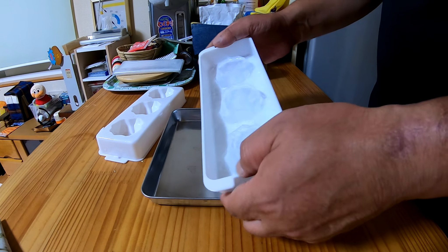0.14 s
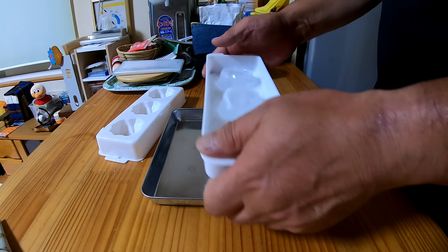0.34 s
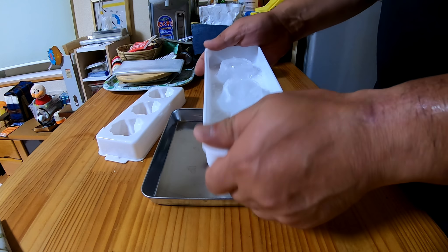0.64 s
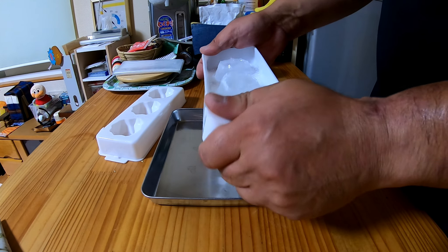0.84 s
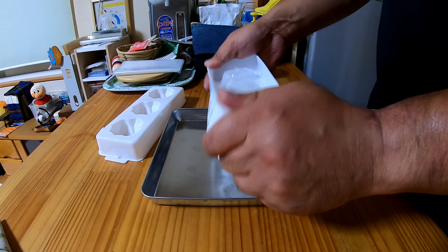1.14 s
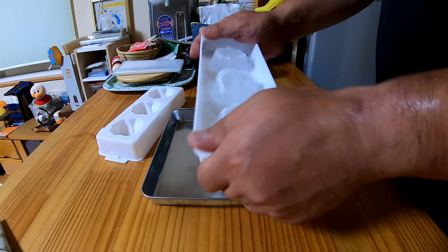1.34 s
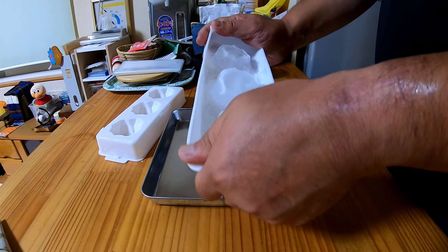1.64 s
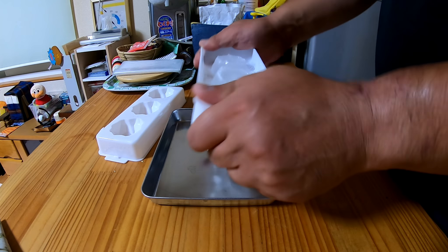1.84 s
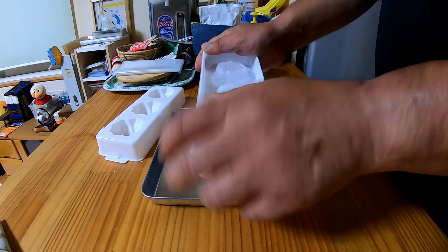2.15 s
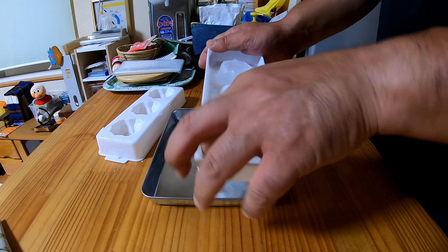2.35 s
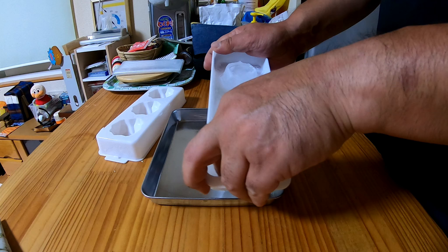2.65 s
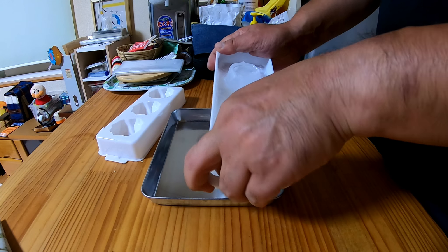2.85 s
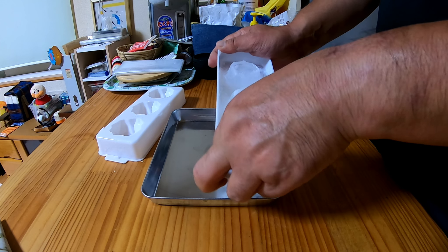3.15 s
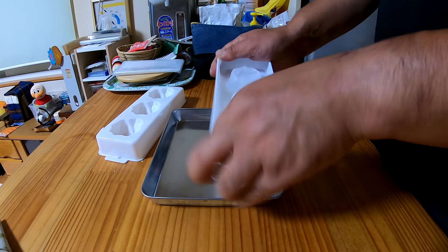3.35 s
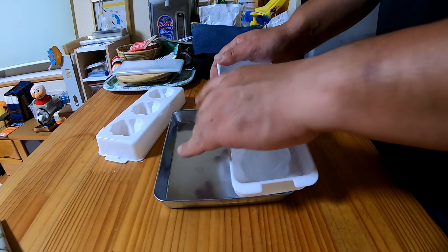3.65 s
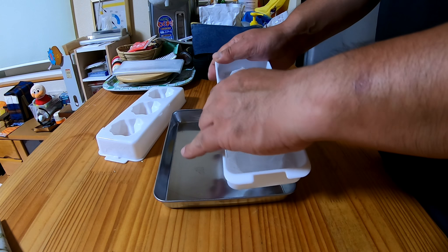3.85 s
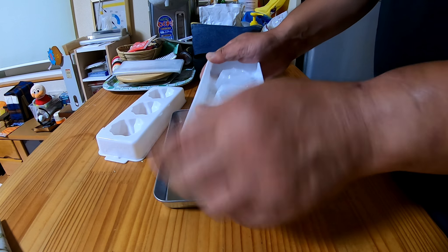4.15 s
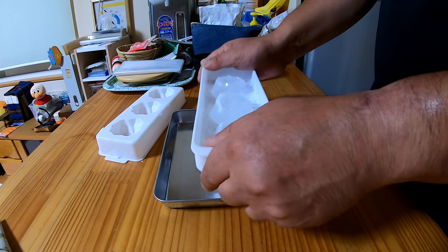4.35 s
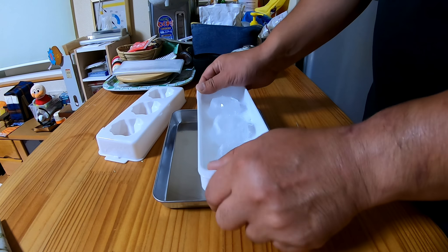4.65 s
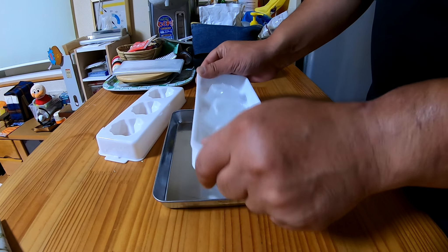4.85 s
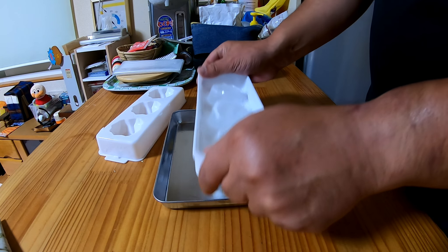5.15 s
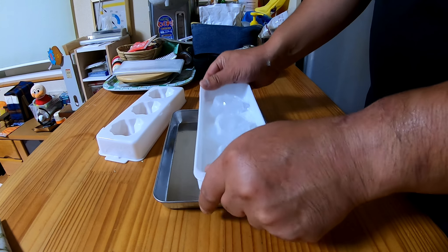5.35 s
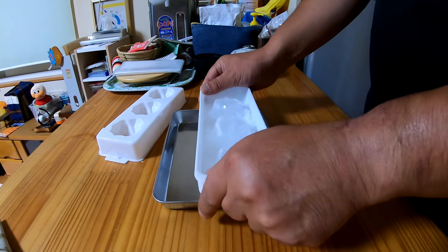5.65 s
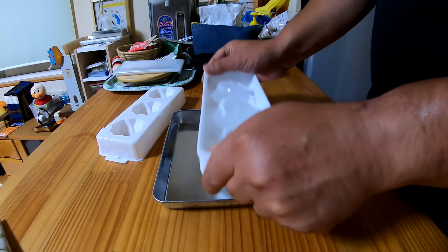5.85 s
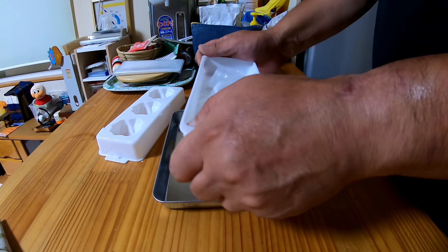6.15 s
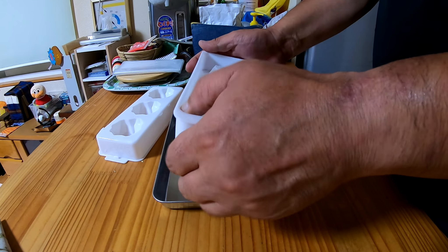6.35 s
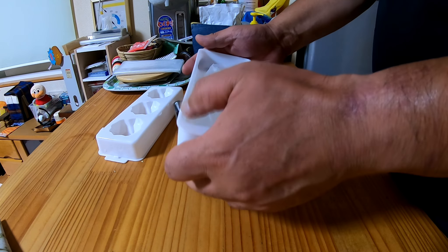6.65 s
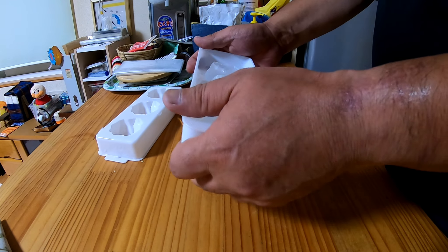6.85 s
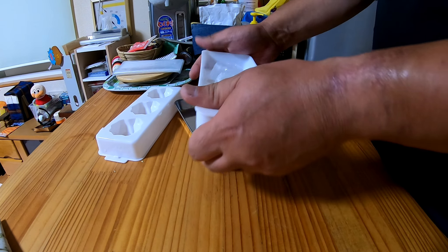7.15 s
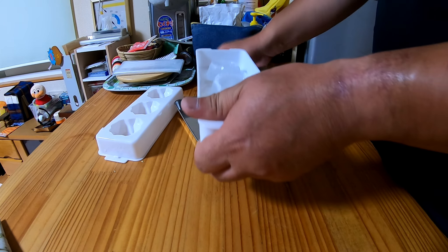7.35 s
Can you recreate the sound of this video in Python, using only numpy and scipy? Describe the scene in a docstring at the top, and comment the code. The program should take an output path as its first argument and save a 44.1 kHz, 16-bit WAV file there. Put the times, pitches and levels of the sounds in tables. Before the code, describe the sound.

A plastic ice cube tray is twisted, creaking and cracking sharply, then banged several times against a steel pan on a wooden table.

```python
"""A quiet kitchen hums, then fingers rustle on a plastic ice tray and it is twisted over a steel pan.
Stick-slip clicks make the creak, splinter bursts and cell rings the cracks, friction noise the squeaks.
Later the tray is knocked down on the pan: noise clatters, modes of the wooden table boom,
and low swings rock the camera standing on it. Sparse taps form the room tail; gain control ducks loud peaks.
"""
import sys
import numpy as np
from scipy import signal
from scipy.io import wavfile
from scipy.ndimage import uniform_filter1d

SR = 44100
rng = np.random.default_rng(int(sys.argv[2]) if len(sys.argv) > 2 else 0)


def field_ratio(decibels):
    """Amplitude ratio for a level in dB (20 dB per decade); scalars and array-likes work."""
    return 10 ** (np.asarray(decibels, dtype=float) / 20)


def master_out(mix):
    """Clip the mix to full scale and print it as 16-bit PCM to the path in sys.argv[1]."""
    frames = np.transpose(np.atleast_2d(mix))
    ceiling = np.clip(frames, -1, 1)
    pcm = np.round(ceiling * 32767).astype(np.int16)
    wavfile.write(sys.argv[1], SR, pcm)


N = 330750

# room air spectrum, relative: pitch_hz, level_db
AIR_COLOUR = [(15, -46), (25, -1.5), (91, -17), (219, -1), (554, -18.5), (649, -13), (916, -24.5),
              (1100, -15), (3630, -26.5), (7610, -38), (14000, -60.5)]
# wavering appliance tones: pitch_hz, resonator_width_hz, level_db
HUM_TONES = [(48, 6.6, -82.5), (153.3, 5.1, -71.5), (213, 23, -76), (1070, 16, -85)]
# left-right likeness of the air: pitch_hz, likeness [0-1]
AIR_LIKENESS = [(30, 0.4), (150, 0.71), (1000, 0.34), (5000, 1), (12000, .3)]

# sustained strains, the long twist and the tray dragged onto the pan: time_s, creak_db, hollow_rel_db
STRAINS = [
    [(0.633, -64, -23), (0.756, -51.5, -1.5), (0.768, -36.5, -20), (0.814, -39.5, -16), (0.926, -35, -14),
     (1.189, -51.5, -9.5), (1.3, -60, -9)],
    [(3.35, -60, -10), (3.384, -35, -16.5), (3.44, -42.5, -8), (3.464, -31, -15.5), (3.532, -38, -20),
     (3.612, -36, -11.5), (3.676, -55, -18)],
]
# short creaks that catch quickly and let go: peak_s, peak_db, fall_20db_s, hollow_rel_db
CREAKS = [(.405, -50.5, 0.14, -8.5), (1.205, -42, .12, -7), (1.333, -34, 0.06, -5),
          (1.39, -46.5, 0.13, -15.5), (1.42, -42.5, .035, -2.5), (1.616, -48, 0.06, -9.5),
          (1.754, -44, 0.06, -10.5), (1.804, -37, 0.0559, -12.5), (1.857, -46, 0.18, -9.5),
          (2.037, -51.5, .05, -11.5), (2.062, -43, 0.04, 0), (2.092, -43, 0.057, -5.5),
          (2.432, -54, 0.36, -8), (2.644, -35, 0.054, -27), (2.844, -59.5, 0.3, -30.5),
          (2.95, -52, 0.07, -6), (5.988, -47, 0.07, -11), (6.07, -45, 0.0456, -17), (6.45, -57, 0.5, -8)]
# fingers sliding on the plastic: peak_s, peak_db, rise_or_fall_20db_s
RUSTLES = [(.3, -62, .5), (1.525, -53, 0.17), (2.6, -53, .35), (4.33, -66, 0.13), (6.14, -62, 0.2),
           (6.37, -66, .08), (7.25, -64, 0.15)]
# the tray scrapes the pan until it lands: end_s, end_db, rise_20db_s
SCRAPES = [(4.968, -37, 0.0375), (5.28, -41, 0.017), (5.591, -39, 0.0134), (6.64, -37.5, 0.0438)]
# colour of the creak: pitch_hz, level_db
CREAK_COLOUR = [(260, -32), (634, -13.5), (701, -21), (1100, -12), (1340, -9), (3080, -7), (5080, -11),
                (7440, -7.5), (16000, -45)]
# resonances of the plastic tray: pitch_hz, width_hz, mean_level_db
TRAY_MODES = [(1080, 130, -1), (2460, 200, -3), (3070, 130, -3), (7200, 170, -16)]

# room decay: pitch_hz, t60_s
ROOM_DECAY = [(100, 0.31), (420, 0.24), (1100, 0.32), (2900, 0.29), (7700, 0.37)]

# single cracks of ice and plastic: start_s, level_db, cell_ring_hz
CRACKS = [(0.293, -46, 2900), (0.4035, -34, 2720), (0.462, -42, 1300), (0.765, -19, 3840),
          (0.7672, -20, 6600), (0.943, -20, 3020), (0.985, -27, 1700), (1.4024, -26, 5600),
          (1.417, -26, 2900), (1.6158, -37, 1620), (1.7508, -32, 3570), (1.7972, -27, 3630),
          (1.8532, -30, 2770), (2.058, -22, 1550), (2.0767, -24.5, 2090), (2.4303, -35.5, 3500),
          (2.491, -29, 2720), (2.5177, -28.5, 2740), (2.5301, -22, 2670), (2.5664, -8.5, 3080),
          (2.6285, -8.5, 3200), (2.6335, -11.5, 3225), (2.7391, -30.5, 2030), (2.8748, -26, 2280),
          (2.9394, -15.5, 2270), (3.3826, -24, 3150), (3.447, -17.5, 1920), (3.4602, -14.5, 2200),
          (3.536, -25, 2700), (3.5728, -24, 2010), (3.6604, -22, 2840), (3.685, -9, 1550),
          (3.897, -47, 1700), (5.047, -29, 6200), (5.5586, -28, 2440), (6.067, -36.5, 3140),
          (6.4065, -49, 3220), (6.636, -16, 1690), (7.2853, -40, 2090)]
# colour of a splinter: pitch_hz, level_db
SPLINTER_COLOUR = [(290, -70), (500, -48), (1400, -25.5), (3200, 4), (4870, -7), (10100, -12), (16000, -43)]

# damp skin drags on a cell wall: peak_s, peak_db, rise_or_fall_20db_s, wall_hz
SQUEAKS = [(.42, -54, .06, 2800), (4.048, -58, .06, 2050), (4.35, -59, .05, 2200), (7.27, -56, .06, 2100)]
# fuzzy resonances of a cell wall: multiple_of_wall_hz, level_db
WALL_MODES = [(.55, -5), (1, 0), (2.8, -11)]

# knocks on the pan: start_s, clatter_db, burst_t60_s, boom_db, rocking_db, rocking_hz
KNOCKS = [(3.466, -2, 0.04, -11, -8.5, 67), (3.595, -16, 0.049, -35, -15.5, 68),
          (3.684, -6, 0.043, -19, -14, 66.4), (4.64, 3, 0.049, -4, 0, 67.2), (4.972, 4, 0.041, -8, -5, 75),
          (5.29, 6, 0.033, -4.5, 0.5, 67), (5.598, 4.5, 0.021, -7, -1.5, 63.9),
          (6.556, -39.5, 0.2, -37.5, -60.5, 66), (6.583, -28, 0.2, -24, -55, 66),
          (6.622, -18.5, 0.18, -26, -42, 66), (6.65, 4, 0.11, -8, -14, 69)]
# colour of the clatter: pitch_hz, level_db
CLATTER_COLOUR = [(180, -23.5), (300, -1.5), (885, -10.5), (2790, -8), (4520, -20), (7320, -19),
                  (13800, -45), (16000, -70)]
# table modes before each blow's scatter: pitch_hz, level_db, t60_s
TABLE_MODES = [(90, -8, 0.15), (138.7, 0, 0.22), (176.6, 9.5, 0.079), (216, 1.5, 0.15), (277, -8.5, 0.22),
               (362.3, -4, 0.095), (559, -14, .08), (810, -18, 0.14)]
# faint long ring of the pan: pitch_hz, level_rel_boom_db, t60_s
PAN_RING = (157, -34.5, 1.1)

# colour of what differs between the ports: pitch_hz, level_db
PORT_COLOUR = [(500, -22), (3000, -11), (6000, -7.5), (9000, 1), (14000, -3.5)]


def evened(x):
    """Scales to rms 1."""
    return x / np.sqrt(np.mean(x ** 2) + 1e-20)


def wander(width):
    """Slow noise of rms 1, smoothed twice over width samples."""
    noise = rng.standard_normal(N)
    return evened(uniform_filter1d(uniform_filter1d(noise, width), width))


def patchy(shape, bins, frames):
    """Noise of rms 1, smoothed over frequency bins and time frames."""
    noise = rng.standard_normal(shape)
    return evened(uniform_filter1d(uniform_filter1d(noise, bins, 0), frames, 1))


def read(points, hz):
    """Reads a table by pitch on a log-frequency axis."""
    f, value = np.transpose(points)
    return np.interp(np.log(hz + 1), np.log(f + 1), value)


def add(mix, start_s, sound):
    """Adds a two-channel sound at start_s."""
    part = mix[:, round(start_s * SR):][:, :sound.shape[1]]
    part += sound[:, :part.shape[1]]


def colour(x, points):
    """Minimum-phase filter with the gain of a pitch_hz, level_db table."""
    hz = abs(np.fft.fftfreq(4096, 1 / SR))
    log_gain = np.log(field_ratio(np.maximum(read(points, hz), -90)))
    taps = np.fft.ifft(np.exp(np.conj(signal.hilbert(log_gain)))).real[:2048]
    return signal.oaconvolve(x, taps)[:len(x)]


def resonate(x, hz, width_hz):
    """Two-pole resonance with gain near 1 at its centre."""
    r = np.exp(-np.pi * width_hz / SR)
    return signal.lfilter([1 - r, 0, r - 1], [1, -2 * r * np.cos(2 * np.pi * hz / SR), r * r], x)


def ring(t, hz, t60_s, phase=0.):
    """One dying mode."""
    return field_ratio(-60 * t / t60_s) * np.sin(2 * np.pi * hz * t + phase)


def sides(x, pan_db):
    """Places a mono sound between the channels, positive to the left."""
    return x * field_ratio([[pan_db / 2], [-pan_db / 2]])


def hum():
    """Room air is partly shared noise with slow patches; appliance tones are narrow-band noise."""
    hz = np.fft.rfftfreq(2048, 1 / SR)
    shape = (len(hz), N // 512 + 5)
    a, b, c, d = rng.standard_normal((4, *shape))
    same = np.clip(read(AIR_LIKENESS, hz), -1, 1)[:, None]
    left = a + 1j * b
    right = same * left + np.sqrt(1 - same ** 2) * (c + 1j * d)
    level_db = read(AIR_COLOUR, hz)[:, None] + 0.5 * patchy(shape, 20, 10)
    z = np.array([left, right]) * field_ratio(level_db)
    air = field_ratio(-64.8) * evened(signal.istft(z, nperseg=2048, noverlap=1536)[1][:, :N])
    noise = rng.standard_normal(N)
    tones = sum(field_ratio(db) * evened(resonate(resonate(noise, f, width_hz), f, width_hz))
                for f, width_hz, db in HUM_TONES)
    return air + tones


def strain():
    """Level and hollowness of the creak: strains add as powers, and the strongest sets the colour."""
    t = np.arange(0, N + 32, 32) / SR
    catch_s, scrape_stop_s = 0.027, 0.01  # s per 20 dB
    rustle_hollow_db, scrape_hollow_db = -6, -3.5
    shapes = []
    for s, db, hollow_db in map(np.transpose, STRAINS):
        shapes.append((np.interp(t, s, db, -120, -120), np.interp(t, s, hollow_db)))
    peaks = [(s, db, catch_s, fall_s, hollow_db) for s, db, fall_s, hollow_db in CREAKS]
    peaks += [(s, db, slope_s, slope_s, rustle_hollow_db) for s, db, slope_s in RUSTLES]
    peaks += [(s, db, rise_s, scrape_stop_s, scrape_hollow_db) for s, db, rise_s in SCRAPES]
    for s, db, rise_s, fall_s, hollow_db in peaks:
        shapes.append((db - 20 * np.maximum((s - t) / rise_s, (t - s) / fall_s), hollow_db))
    power, hollow = 1e-12, 0
    for db, hollow_db in shapes:
        power = power + field_ratio(2 * db)
        hollow = hollow + field_ratio(2 * db) * hollow_db
    return np.repeat(10 * np.log10(power), 32)[:N], np.repeat(hollow / power, 32)[:N]


def creak():
    """Uneven stick-slip clicks ring the tray: sparse ticks under light strain, a dense singing rasp under hard."""
    level_db, hollow_db = strain()
    hard = np.clip((uniform_filter1d(level_db, 4000) + 54) / 20, 0, 1)  # sustained strain, 0-1
    slips_per_s = 1500 + 6000 * hard
    uneven_db = (2.0 - 1.14 * hard) * np.minimum(rng.exponential(1, N), 5)
    clump_db = (3.0 - 1.2 * hard) * wander(180)
    size = field_ratio(uneven_db + clump_db) / np.sqrt(slips_per_s) * field_ratio(3.2 * hard)
    slips = size * rng.choice([-1., 1.], N) * (rng.random(N) < slips_per_s / SR)
    body = evened(colour(slips, CREAK_COLOUR))
    # the shifting grip frees now one resonance, now another
    singing = sum(field_ratio(db + 4 * wander(2500)) * resonate(slips, hz, width_hz)
                  for hz, width_hz, db in TRAY_MODES)
    body += 1.1 * hard * evened(singing)
    hz, _, z = signal.stft(body, SR, nperseg=256)
    z *= field_ratio(2 * patchy(z.shape, 5, 8))  # it bends
    bands = (hz < 1500, abs(hz - 3000) < 1500, hz > 4500)
    low, mid, top = (signal.istft(z * band[:, None], SR, nperseg=256)[1][:N] for band in bands)
    # a hollower or lighter creak is duller
    top_db = -.3 * (hollow_db + 19.5) - 2.2 * (1 - hard)
    high = evened(mid + field_ratio(top_db) * top)
    return sides(field_ratio(uniform_filter1d(level_db, 100)) * (high + field_ratio(hollow_db) * evened(low)), .3)


def kitchen(x):
    """Sparse signed taps from 7 ms on, each band dying at its own speed; three tails take turns as the tray moves."""
    out = np.zeros((2, N))
    turn = 2 * np.pi * np.arange(N) / SR  # one turn a second
    for k in range(3):
        taps = np.zeros((2, SR))
        at = np.arange(300, SR - 20, 20) + rng.integers(0, 20, (2, (SR - 301) // 20))
        np.put_along_axis(taps, at, rng.choice([-1., 1.], at.shape), 1)
        taps[1] = .55 * taps[0] + .83 * taps[1]
        hz, t, z = signal.stft(taps, SR, nperseg=256)
        tail = signal.istft(z * field_ratio(-60 * t / read(ROOM_DECAY, hz)[:, None]), SR, nperseg=256)[1]
        share = np.sqrt(2 / 3) * np.cos(turn + 2 * np.pi * k / 3)
        fed = (x.mean(0) * share)[None]
        out += signal.oaconvolve(fed, tail / np.linalg.norm(tail[0]), axes=1)[:, :N]
    return out


def cracks():
    """Each crack is a splinter noise burst of a few milliseconds plus a short ring of the nearest cell."""
    out, t = np.zeros((2, N)), np.arange(1500) / SR
    for start_s, db, hz in CRACKS:
        splinter = colour(rng.standard_normal(1500) * field_ratio(-60 * t / .011), SPLINTER_COLOUR)
        cell = ring(t, hz, .0058) * np.minimum(t / .0007, 1)
        snap = 0.5 * splinter / abs(splinter).max() + 1.7 * cell
        add(out, start_s, sides(field_ratio(db) * snap, -.3))
    return out


def squeaks():
    """Smooth friction noise through the resonances of the wall under the finger."""
    out, t = np.zeros((2, N)), np.arange(-8000, 8000) / SR
    for peak_s, db, slope_s, hz in SQUEAKS:
        noise = rng.standard_normal(len(t))
        wall = sum(field_ratio(d) * evened(resonate(noise, k * hz, 0.08 * k * hz)) for k, d in WALL_MODES)
        add(out, peak_s + t[0], field_ratio(db - 20 * abs(t) / slope_s) * evened(wall)[None])
    return out


def clatter_of(noise, t, db, t60_s):
    """Noise burst of tray, ice and steel with a rattling tail, peak 1; softer landings are duller."""
    chance = rng.standard_normal(SR)
    # loose cubes jostle
    rattle = evened(noise * field_ratio(5.0 * uniform_filter1d(chance, 90) * np.sqrt(90)))
    burst = noise * field_ratio(-60 * t / t60_s) + 0.06 * rattle * field_ratio(-60 * t / 0.32)
    clatter = colour(burst * np.minimum(t / (0.0098 * t60_s), 1), CLATTER_COLOUR)
    # a longer landing is duller and lets the tray's cells ring, lower when it is gentle
    clatter = signal.lfilter([1], [1, -np.clip(6 * t60_s, 0, .9)], clatter)
    cells_hz = 2700 * field_ratio(1.6 * t60_s * db)
    clatter += 15 * t60_s * resonate(clatter, cells_hz, .74 * cells_hz)
    return clatter / abs(clatter).max()


def boom_of(t, t60_s):
    """Table modes and the pan's long ring; each blow lands elsewhere, so pitch and strength scatter."""
    shift, spot = rng.standard_normal((2, len(TABLE_MODES)))
    boom = sum(field_ratio(db + 2 * p) * ring(t, hz * (1 + 0.0085 * q), mode_t60_s)
               for (hz, db, mode_t60_s), q, p in zip(TABLE_MODES, shift, spot))
    boom = -boom / np.std(boom[:1500]) * np.minimum(t / (0.094 * t60_s), 1)
    pan_hz, pan_db, pan_t60_s = PAN_RING
    return boom + field_ratio(pan_db) * ring(t, pan_hz, pan_t60_s)


def knocks():
    """Airborne clatter and table boom of each blow, led in by a scuff."""
    out, t, lead = np.zeros((2, N)), np.arange(SR) / SR, np.arange(-1300, 0) / SR
    for start_s, db, t60_s, boom_db, _, _ in KNOCKS:
        noise = rng.standard_normal(SR)
        clatter = field_ratio(db) * clatter_of(noise, t, db, t60_s)
        add(out, start_s, sides(clatter, -1.8) + field_ratio(boom_db) * boom_of(t, t60_s))
        # one edge touches down first
        scuff = evened(resonate(resonate(noise[-1300:], 340, 430), 340, 430)) * field_ratio(-17.5 + 1880 * lead)
        add(out, start_s + lead[0], sides(field_ratio(boom_db) * scuff, .1))
    return out


def rocking():
    """The camera rocks on the shaken table, building over two swings; its right side feels it most."""
    out, t = np.zeros((2, N)), np.arange(SR) / SR
    build = (1 - np.exp(-t / 0.013)) ** 2
    for start_s, _, _, _, db, hz in KNOCKS:
        swing = ring(t, hz, .2) + 0.35 * ring(t, 1.16 * hz, 0.25) + 0.18 * ring(t, 0.73 * hz, 0.34)
        left = .8 * ring(t, hz, .25, 1.2) + .5 * swing
        add(out, start_s, field_ratio(db) * build * np.array([left, 3 * swing]))
    return out


def scene():
    """Near sounds, their room tail, the shaken camera and the hum."""
    small, blows = creak() + cracks() + squeaks(), knocks()
    tail = kitchen(field_ratio(-11) * small + field_ratio(-5.5) * blows)
    return hum() + small + tail + blows + rocking()


def roll_off(x):
    """The treble ends steeply here."""
    return signal.sosfilt(signal.butter(12, 16410, fs=SR, output="sos"), x)


def record(dry):
    """Two ports hear the treble differently; gain control drops at loud peaks and climbs back."""
    # scatter off the housing and table
    scatter = evened(rng.standard_normal(900) * np.exp(-np.arange(900) / 200.)) / np.sqrt(900)
    apart = colour(signal.oaconvolve(dry.mean(0), scatter)[:N], PORT_COLOUR)
    ports = dry + np.array([apart, -apart])
    power_db = 10 * np.log10(abs(uniform_filter1d((ports ** 2).mean(0), 200)) + 1e-12)
    sink_db = np.arange(N) * 97.0 / SR  # the held peak sinks 97 dB a second
    held_db = np.maximum.accumulate(power_db + sink_db) - sink_db
    over_db = np.maximum(held_db + 36.0, 0)
    mix = ports / field_ratio(0.27 * uniform_filter1d(over_db, 100))
    return roll_off(mix)


dry = scene()
out = record(dry)
master_out(out)
```